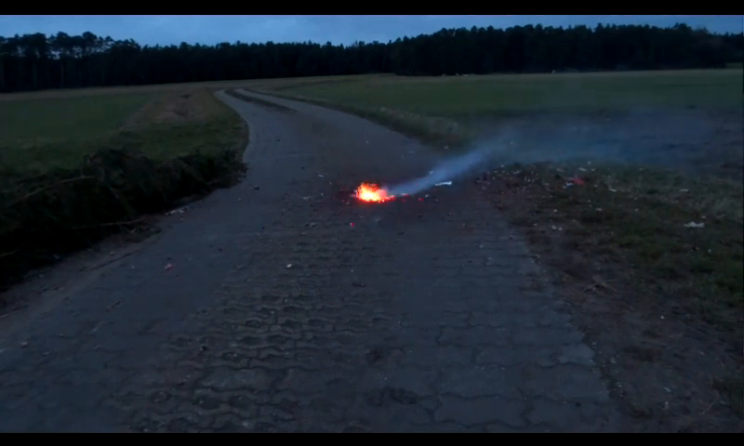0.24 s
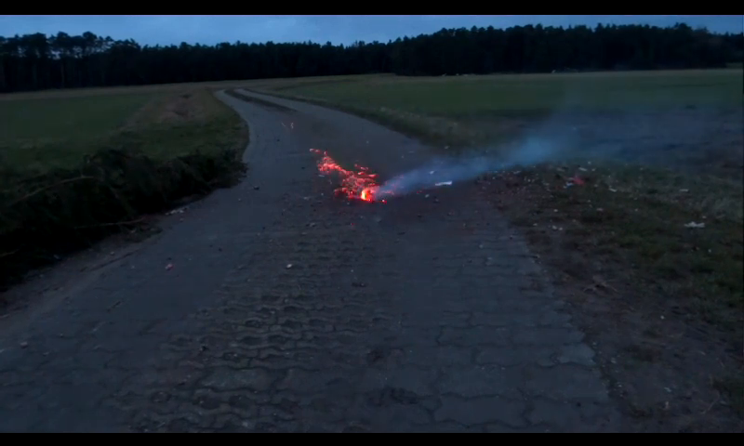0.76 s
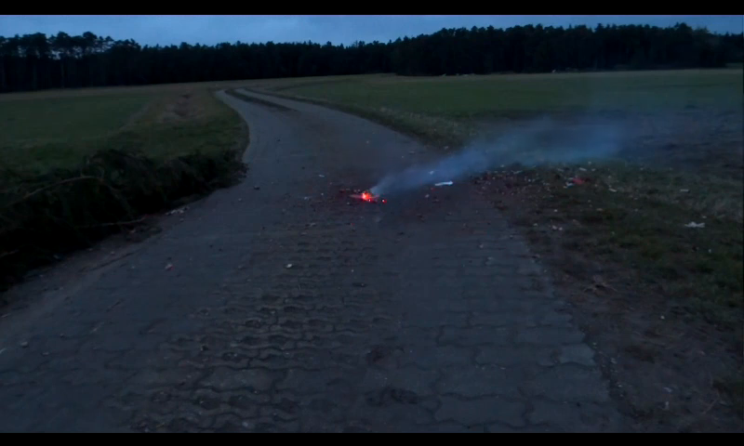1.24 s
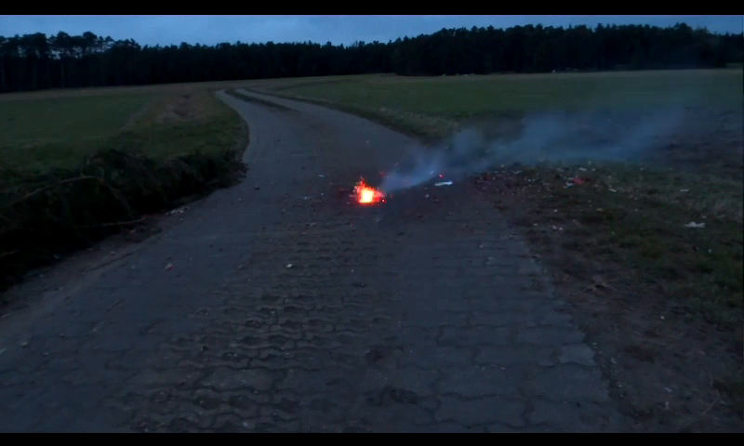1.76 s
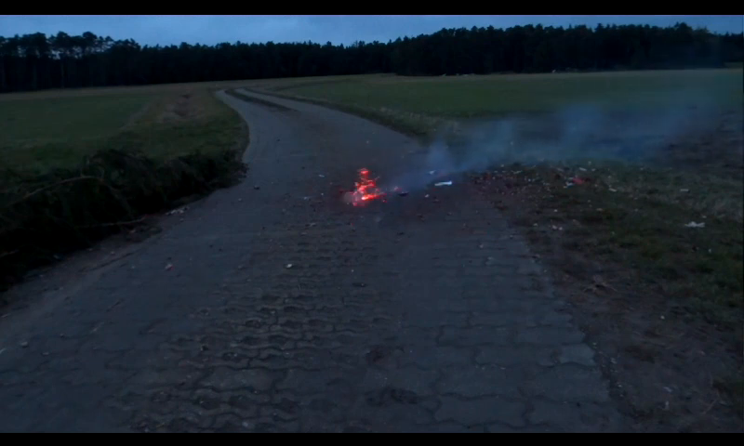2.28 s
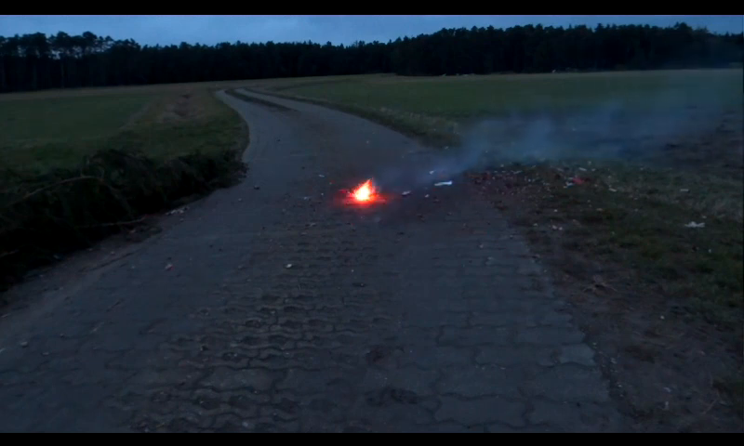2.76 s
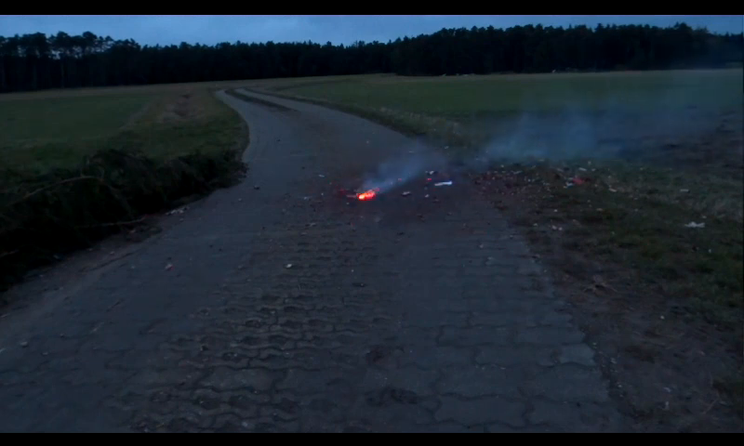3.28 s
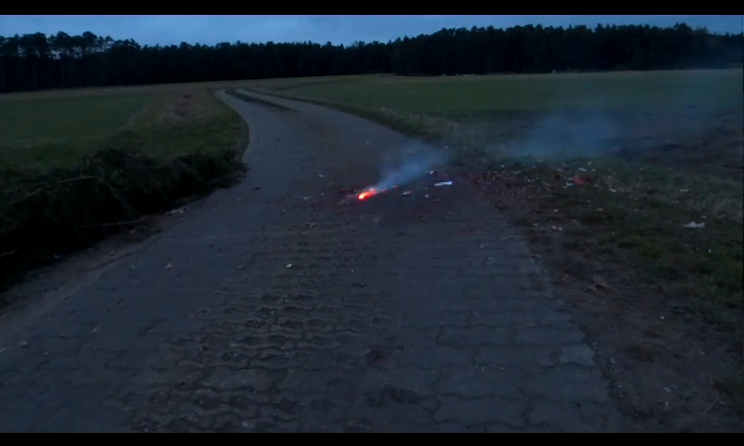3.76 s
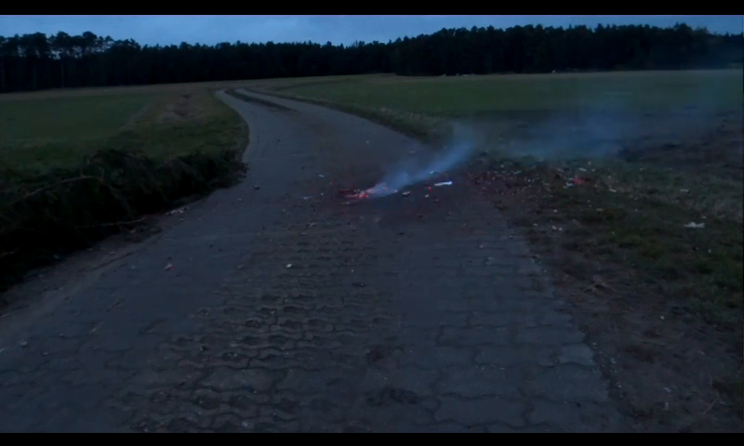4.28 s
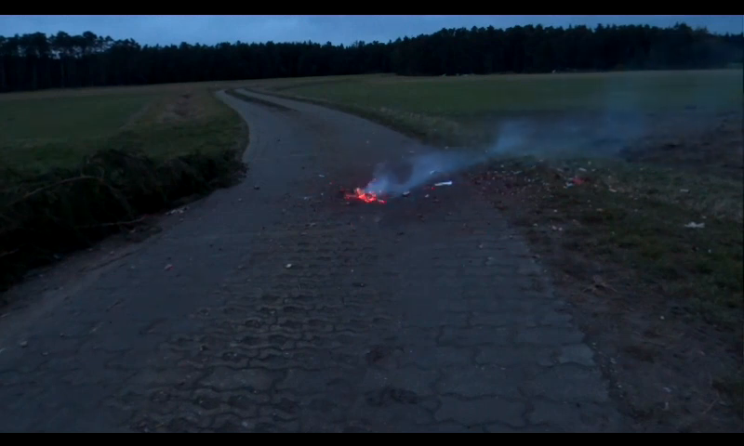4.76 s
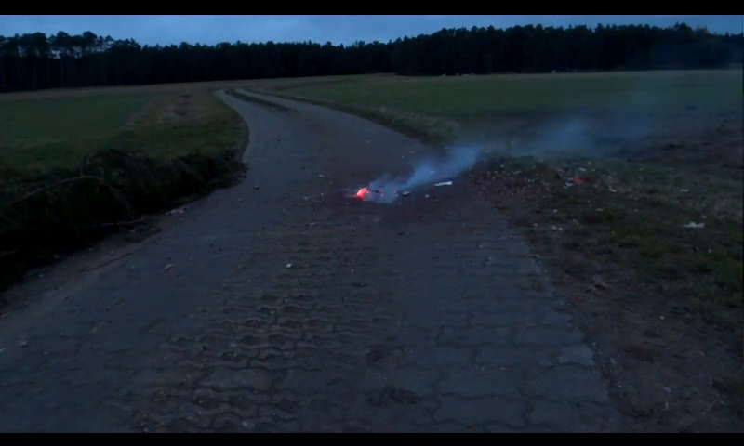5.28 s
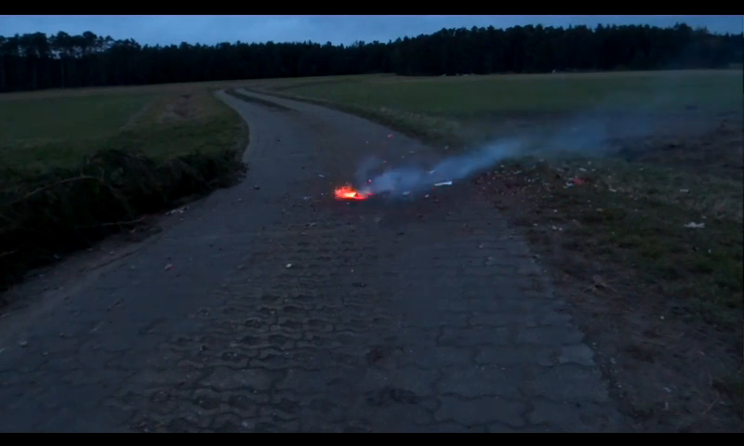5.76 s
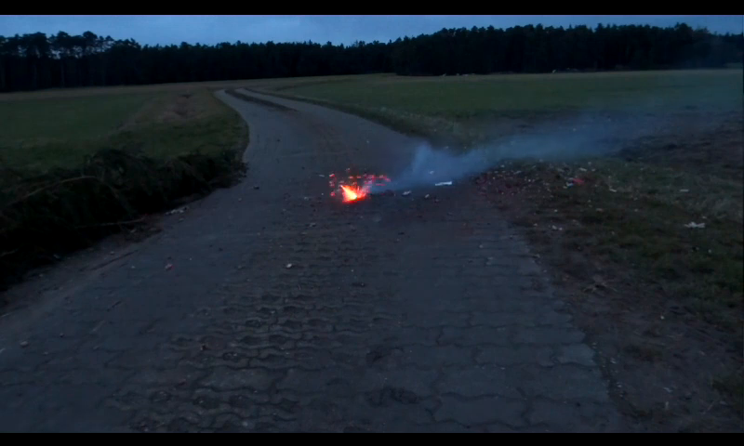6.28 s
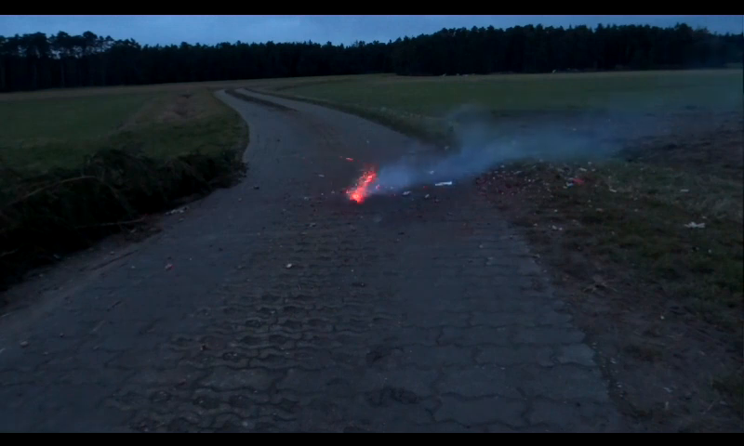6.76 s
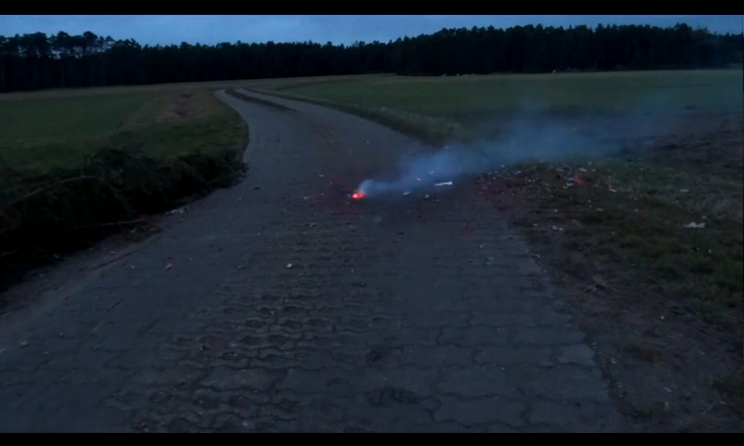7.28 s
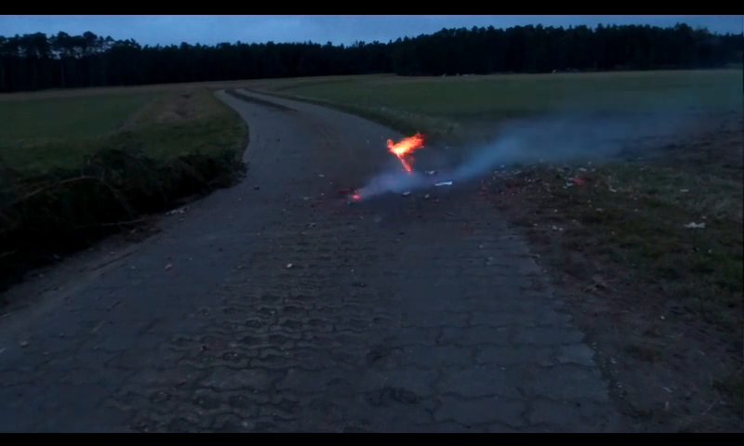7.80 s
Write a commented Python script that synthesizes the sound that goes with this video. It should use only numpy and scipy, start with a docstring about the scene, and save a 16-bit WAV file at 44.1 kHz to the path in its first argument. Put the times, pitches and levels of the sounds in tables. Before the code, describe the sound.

Sharp firecracker bangs start almost at once and continue raggedly to the end, varying from bright snaps to duller pops, singly and in tight clusters. A quiet, flickering, high hiss of burning fuse fills the gaps, with soft low wind buffets on the microphone. Open air, short dry echoes from paving and verges, a slight metallic ring at the camera body and faint woodland reverberation; the source is central and a few metres off.

```python
"""Fuse fizz and buffeting wind, then a ragged string of sharp bangs: firecrackers on a paved field lane at
dusk, some metres from the camera's two microphone ports. Each cracker is a pressure pulse plus a crack of
filtered noise; some spit gas close to the burst, as swelling noise. Every bang sets off the same pattern of
near and far echoes, rings the camera body, and scatters as shaped noise off paving, verges and woods.
The fuse is flickering coloured noise; the wind is gusting low noise with eddies at each port."""
import sys
import numpy as np
from scipy import signal
from scipy.fft import rfft, irfft
from scipy.io import wavfile
from scipy.ndimage import uniform_filter1d

SR = 44100
rng = np.random.default_rng(int(sys.argv[2]) if len(sys.argv) > 2 else 0)


def wav_record(signal):
    """Record a signal, one row per channel, as 16-bit PCM in the file named by sys.argv[1]."""
    frames = np.transpose(np.atleast_2d(signal))
    bounded = np.clip(frames, -1, 1)
    # unit amplitude maps onto the largest positive 16-bit level
    quanta = np.round(bounded * 32767).astype(np.int16)
    wavfile.write(sys.argv[1], SR, quanta)


N = 354123

# All table levels are relative: each layer adds its own trim.
# How fiercely the fuse burns: (t/s, level/dB)
FUSE_BURN = [(0.15, -41.5), (1.1, -39.5), (1.65, -36), (2.08, -42.5), (2.4, -40.5), (3.45, -39.5),
             (3.8, -38.5), (4.3, -39.5), (5.25, -40.5), (6.1, -36.5), (7.0, -43.5), (8.0, -44)]
# Gusts at the microphone: (start t/s, hold length/s, level/dB)
WIND_GUSTS = [(0.035, 0.25, -30), (0.304, 0.17, -31), (0.546, 0.068, -27.5), (0.857, 0.18, -36),
              (1.36, 0.32, -43.5), (2.094, 0.19, -43), (2.58, 0.21, -47), (2.918, 0.41, -34),
              (3.348, 0.28, -41.5), (3.744, 0.1, -29.5), (4.045, 0.35, -34), (4.542, 0.44, -35.5),
              (5.38, 0.62, -43), (5.989, 0.26, -31.5), (6.426, 0.7, -35.5), (7.184, 0.42, -36),
              (7.47, 0.28, -32), (7.717, 0.26, -29)]
# Gas spat from a casing close to its burst: (end t/s, length/s, level/dB)
GAS_SPITS = [(0.112, 0.016, -17.5), (0.37, 0.0092, -19), (0.72, 0.006, -22), (0.853, 0.0074, -26),
             (1.373, 0.031, -16.5), (1.555, 0.0073, -32), (1.775, 0.0024, -13), (2.194, 0.014, -19.5),
             (2.561, 0.0054, -21), (2.745, 0.023, -26), (2.874, 0.013, -21.5), (3.873, 0.018, -27.5),
             (4.358, .015, -20.5), (4.416, 0.0083, -20), (4.672, 0.022, -27), (5.089, 0.0045, -12),
             (6.222, 0.0086, -25), (6.302, 0.0075, -16), (6.676, 0.011, -22), (6.859, 0.0075, -19),
             (7.08, 0.01, -21.5), (7.345, 0.0056, -20), (7.804, 0.0064, -27)]
# Bursts: (t/s, pressure pulse level/dB, crack level/dB, scattered tail level/dB, length of the push/s)
BURSTS = [(0.1145, 0, -1, -15, 0.00021), (0.2606, -3, 4.5, 0.5, 0.00026), (0.372, -7.5, 6.5, 1, 0.00036),
          (.541, -10, 5.5, 0, 0.00029), (0.7230, 3.5, 12, 3, 0.00014), (0.8567, 2, -2, 4.5, 0.00023),
          (1.2757, -4, 10.5, -2.5, 0.000086), (1.3716, -6, -20, -12.5, 0.00041),
          (1.5682, 1.5, 2.5, 4.5, 0.00024), (1.588, -4, 11, -6, 0.00018), (1.7790, 4, 10.5, 1, 2e-4),
          (1.9012, 6, 5, 2.5, 0.00022), (2.1983, -2.5, -1, -1.5, 0.00032), (2.228, 1, 8.5, 0, 2e-4),
          (2.5636, 5.5, 0, -1, 0.00018), (2.7352, -4, -5, -18, 0.00019), (2.875, -2, 0.5, -13, 0.00017),
          (3.1351, -2, 5, -6.5, 0.00012), (3.3533, -6, -3, -16, 0.00024), (3.572, -2.5, 11, 0.5, 0.0002),
          (3.8753, 0.5, 9.5, -4.5, 0.00012), (4.363, -2, 11, -0.5, 0.00023), (4.418, 1, 6, -6.5, 0.00024),
          (4.426, -21, -4, -15, 1.5e-4), (4.5846, 0.5, 4, 1.5, 0.00029), (4.6735, -3.5, 5, -3, 0.000073),
          (4.994, -12, 9, 0, 0.00016), (5.008, -6.5, 4.5, 0.5, 0.00018), (5.094, 6, -7, -4.5, 0.00021),
          (5.3688, 0, 2.5, 3, 0.00022), (5.5044, -9, 5, 5, 0.00023), (5.5142, 2, 8, -7, 0.00022),
          (5.522, -0.5, 2, 4, 0.00017), (5.7894, 5, 0, -1, 0.00021), (6.2215, -14, 3.5, 1, 0.00021),
          (6.304, -10, 8, -5, 0.00013), (6.4114, 0.5, 1.5, 2, 0.00019), (6.4428, -0.5, 2, 0.5, 2e-4),
          (6.6757, 6.5, 7, 4, 0.00015), (6.746, 4, -1, 0.5, 0.00015), (6.8628, -1.5, -3.5, 0.5, 0.00018),
          (7.081, -1.5, 1, 0, 0.00018), (7.3464, 0.5, 4.5, -2.5, 0.00015),
          (7.3964, -23, 1.5, -10.5, 0.00014), (7.5496, -2, -1.5, 3, 0.00023),
          (7.6022, 2.5, -0.5, -6.5, 0.00017), (7.8034, -7, 1, 2, 0.00025)]
# Ringing of the camera body under the blast: (f/Hz, level/dB, time to fall 60 dB/s)
BODY_MODES = [(419, 6, 0.24), (558, 18.5, 0.17), (780, 2.5, 0.25), (937, -10, 0.9), (1016, 25.5, 0.22),
              (1440, 13, 0.035), (1730, 3, .12), (2237, 28, 0.1), (2930, -12, 0.79)]
# Surfaces near the lane and banks further off: (delay t/s, level/dB, centre f/Hz, width/Hz)
REFLECTIONS = [ (.0022, -9.5, 2600, 6300), (.0033, -4, 7460, 10100), (.0076, -4, 2130, 3800),
               (.0079, -5.5, 6600, 5940), (.0117, -4.5, 780, 1180), (.0155, -5.5, 540, 780),
               (.0196, -6, 810, 1000), (.0265, -26, 2110, 1920), (.0292, -9.5, 1580, 1820),
               (.0313, -5, 770, 750), (.0830, -4, 690, 485), (.1323, -5, 830, 530), (.1373, -12, 676, 500),
               (.1740, -19, 860, 565)]
# Spectrum of the fuse hiss: (f/Hz, level/dB)
FUSE_SPECTRUM = [(300, -18), (1000, -17), (2500, -9.5), (4400, -9), (5600, -7), (7300, 0), (8800, -4),
                 (11000, -10.5), (13000, -21), (16000, -28)]
# Spectrum of the wind rumble: (f/Hz, level/dB)
WIND_SPECTRUM = [(20, 1.5), (45, -1), (100, 1.5), (170, -1), (260, -7), (400, -12), (700, -20.5),
                 (1400, -37), (4000, -49.5)]
# Spectrum of the spitting gas: (f/Hz, level/dB)
JET_SPECTRUM = [(300, -16), (1000, -1.5), (3000, -3), (4500, -1.5), (7200, 6), (10000, 3), (16000, -15.5)]
# Spectrum of the crack: (f/Hz, level/dB)
CRACK_SPECTRUM = [(150, -22), (700, -7), (1300, 1), (1900, 9), (3200, 8), (4500, -0.5), (7300, 8.5),
                  (10000, 2.5), (13000, -2), (16000, -19.5)]
# Spectrum of the thud from the verges: (f/Hz, level/dB)
THUD_SPECTRUM = [(60, -23.5), (200, -13), (420, 0), (900, -2.5), (1500, -5.5), (3000, -15), (8000, -47)]
# Spectrum of the scatter off stones and grass: (f/Hz, level/dB)
SCATTER_SPECTRUM = [(200, -27), (700, -3.5), (1300, -1), (2200, 4.5), (3200, 7), (4500, 0.5), (6000, 4.5),
                    (7500, 6), (9500, -0.5), (12000, -9), (16000, -19)]
# Spectrum of the roll from the woods: (f/Hz, level/dB)
FOREST_SPECTRUM = [(100, 6), (400, -9), (900, -1), (2500, 2.5), (5000, -12), (12000, -58)]

GUST_ATTACK_S, GUST_RELEASE_S = 0.019, 0.057
BREEZE_DB, STRONG_GUST_DB = -50, -27  # before trim: wind between gusts, and a gust full of eddies
TOP_HZ = 15800  # upper edge of the recorder's passband
TIME = np.arange(N) / SR
SIDES = np.array([[1], [-1]])  # opposite signs at the two ports


def gain(db):
    """Decibels to amplitude gain."""
    return 10 ** (np.asarray(db) / 20)


def unit(x):
    """Scale to rms 1."""
    return x / np.sqrt(np.mean(x ** 2))


def unit_energy(x):
    """Scale an impulse response to energy 1, averaged over its channels."""
    return unit(x) / np.sqrt(x.shape[-1])


def curve(rows):
    """Join (t/s, value) rows by straight lines."""
    return np.interp(TIME, *np.transpose(rows))


def convolve(x, response):
    """Pass x through an impulse response, keeping its length."""
    full = signal.fftconvolve(np.atleast_2d(x), np.atleast_2d(response), axes=-1)
    return full[:, :x.shape[-1]]


def colour(x, points, size=2048):
    """Causal minimum-phase filter with a (f/Hz, level/dB) spectrum, built from its cepstrum."""
    hz, db = np.transpose(points)
    bins = np.maximum(np.arange(size // 2 + 1) * SR / size, 1)
    magnitude = gain(np.interp(np.log(bins), np.log(hz), db))
    cepstrum = irfft(np.log(magnitude))
    # fold the cepstrum onto positive time, so the response starts at once
    cepstrum[1:size // 2] *= 2
    cepstrum[size // 2 + 1:] = 0
    return convolve(x, irfft(np.exp(rfft(cepstrum))))


def band(x, hz, width):
    """Two-pole band-pass, gain 1 at the centre."""
    b, a = signal.iirpeak(hz, hz / width, fs=SR)
    return signal.lfilter(b, a, x)


def stereo_noise(count, side_db):
    """White noise common to both channels, with a share that differs."""
    mid, side = rng.standard_normal((2, count))
    return unit(mid + gain(side_db) * side * SIDES)


def walk(rate):
    """Random levels held 1 / rate s, smoothed twice, trimmed to length and scaled to rms 1."""
    hold = max(int(SR / rate), 1)
    steps = np.repeat(rng.standard_normal(N // hold + 1), hold)
    smooth = uniform_filter1d(uniform_filter1d(steps, hold), hold)
    return unit(smooth[:N])


def add(track, s, sound):
    """Mix a sound into a track at time s."""
    i = max(int(s * SR), 0)
    track[..., i:i + sound.shape[-1]] += sound[..., :N - i]


def fuse(trim_db=-1, flicker_db=2.96, spark_db=1.0):
    """The fuse fizzes straight ahead with tiny sparks; its hiss slowly shifts in colour."""
    sparks = rng.standard_normal(N) * gain(spark_db * walk(1200))
    hiss = colour(sparks, FUSE_SPECTRUM)
    # two treble bands drift up and down on their own
    shifts = sum((gain(1.8 * walk(4)) - 1) * band(hiss, hz, 1800) for hz in (6200, 8600))
    level_db = trim_db + curve(FUSE_BURN) + flicker_db * walk(23)
    return unit(hiss + shifts) * gain(level_db)


def swell(start, length, attack, release):
    """One gust: it builds up, holds for its length and dies away."""
    age = np.maximum(TIME - start, 0)
    rise = 1 - np.exp(-age / attack)
    return rise * np.exp(-np.maximum(age - length, 0) / release)


def airflow(wander_db=3.5, lump_db=1.4):
    """Wind strength in dB: the powers of lumpy gusts and a light, wandering breeze add up."""
    gusts = sum((gain(db) * swell(start, length, GUST_ATTACK_S, GUST_RELEASE_S)) ** 2
                for start, length, db in WIND_GUSTS)
    breeze = gain(BREEZE_DB + wander_db * walk(1.9)) ** 2
    lumps = gain(lump_db * walk(22)) ** 2
    return 10 * np.log10(breeze + gusts * lumps)


def wind(trim_db=-4, flutter_db=2.0, eddy_db=-0.5, eddy_growth=1.57, eddy_hz=215, eddy_width=240):
    """A deep rumble largely shared by both ports; small eddies differ at each and outgrow it in gusts."""
    gust_db = airflow()
    rumble = unit(colour(stereo_noise(N, side_db=-9.5), WIND_SPECTRUM)) * gain(trim_db + gust_db)
    eddy_noise = stereo_noise(N, side_db=0.0)
    eddies = unit(band(band(eddy_noise, eddy_hz, eddy_width), eddy_hz, eddy_width))
    # eddies gain eddy_growth dB for each dB of wind
    eddy_level = gain(eddy_db + STRONG_GUST_DB + eddy_growth * (gust_db - STRONG_GUST_DB))
    return (rumble + eddies * eddy_level) * gain(flutter_db * walk(70))


def spits(trim_db=-6, grit_db=3.0):
    """Jets of burning gas: gritty noise that swells and breaks off."""
    jets = np.zeros(N)
    for end, length, jet_db in GAS_SPITS:
        ramp = np.linspace(0, 1, max(int(length * SR), 2))
        add(jets, end - length, gain(jet_db) * ramp)
    gas = rng.standard_normal(N) * gain(grit_db * walk(4000))
    return gain(trim_db) * jets * unit(colour(gas, JET_SPECTRUM)[0])


def blasts(pulse_db=-2, crack_s=0.00091, crack_db=1.0, tear_db=-4):
    """Each burst: a pressure pulse with a shock front, and a casing that tears differently each time."""
    t = TIME[:1024]
    direct = np.zeros(N)
    for s, push_db, snap_db, _, push_s in BURSTS:
        # overpressure, then suction; a longer push makes a duller pop
        age = t / push_s
        pulse = (1 - age) * np.exp(-age)
        tear = gain(tear_db) * unit_energy(rng.standard_normal(len(t)) * np.exp(-t / crack_s))
        click = t == 0
        crack = unit_energy(colour(tear + click, CRACK_SPECTRUM)[0])
        add(direct, s, gain(pulse_db + push_db) * pulse + gain(crack_db + snap_db) * crack)
    return direct


def ports(x, side_db=-8, hz=7300, width=2600):
    """Treble bends round the camera body and reaches the two microphone ports out of step."""
    bent = np.gradient(band(x, hz, width))
    return x + gain(side_db) * bent * SIDES


def body(trim_db=-20):
    """Impulse response of the camera body: decaying sine modes struck by every blast."""
    t = TIME[:SR // 4]
    rings = sum(gain(mode_db - 60 * t / t60) * np.sin(2 * np.pi * hz * t)
                for hz, mode_db, t60 in BODY_MODES)
    return gain(trim_db) * unit_energy(rings)


def echoes(side_db=-10):
    """Each reflection returns one band of the bang, rounded off, leaning to alternate sides."""
    response = np.zeros((2, SR // 4))
    click = 1. * (TIME[:512] == 0)
    for k, (delay, db, hz, width) in enumerate(REFLECTIONS):
        slap = band(band(click, hz, width), hz, width)
        lean = 1 + (-1) ** k * gain(side_db) * SIDES
        add(response, delay, gain(db) * slap * lean)
    return response


def wash(levels_db, fall, spectrum, side_db, grain_db, clump_db):
    """Countless small reflections: grainy, clumped noise whose power follows each bang with the same fall."""
    power = np.zeros(N)
    for burst, db in zip(BURSTS, levels_db):
        add(power, burst[0], (gain(db) * fall) ** 2)
    grains = stereo_noise(N, side_db) * gain(grain_db * walk(2500) + clump_db * walk(300))
    return np.sqrt(power) * unit(colour(grains, spectrum))


def verge(trim_db=-26, rise_s=0.0016, decay_s=0.049, tail_share=0.26):
    """The pulse rolls back from the verges as a dull thud, more so from bursts that scatter widely."""
    t = TIME[:SR // 2]
    fall = (1 - np.exp(-t / rise_s)) * np.exp(-t / decay_s)
    _, push_db, _, tail_db, _ = np.transpose(BURSTS)
    levels_db = push_db + tail_share * tail_db
    return gain(trim_db) * wash(levels_db, fall, THUD_SPECTRUM, side_db=-16, grain_db=2, clump_db=3)


def paving(trim_db=-15, early_s=0.0035, late_s=0.042, late_db=-6, rise_s=0.0033):
    """The crack scatters off stones and grass: a quick fall, then a slower one."""
    t = TIME[:SR // 2]
    decay = np.exp(-t / early_s) + gain(late_db) * np.exp(-t / late_s)
    fall = (1 - np.exp(-t / rise_s)) * decay
    tail_db = np.array(BURSTS)[:, 3]
    scatter = wash(tail_db, fall, SCATTER_SPECTRUM, side_db=-18.5, grain_db=1.4, clump_db=1.43)
    return gain(trim_db) * scatter


def forest(trim_db=-45, rise_s=0.011, decay_s=0.25):
    """A faint, slowly decaying roll from the edge of the woods."""
    t = TIME[:2 * SR]
    fall = (1 - np.exp(-t / rise_s)) * np.exp(-t / decay_s)
    tail_db = np.array(BURSTS)[:, 3]
    roll = wash(tail_db, fall, FOREST_SPECTRUM, side_db=-16, grain_db=1.5, clump_db=3)
    return gain(trim_db) * roll


def scene(direct_db=5):
    """Bangs with their echoes over fuse and wind."""
    burst = spits() + blasts()
    direct = gain(direct_db) * ports(burst)
    returned = convolve(burst, echoes() + body())
    return fuse() + wind() + direct + returned + verge() + paving() + forest()


def record(dry):
    """The microphone overloads softly on the shock fronts; the recorder rolls off the top."""
    ceiling = .62  # full-scale amplitude that the overload approaches
    clipped = ceiling * np.tanh(dry / ceiling)
    toned = colour(clipped, [(20, -1), (60, 2.5), (8500, -2.5), (12000, -5), (16000, -12.0)])
    top_cut = signal.ellip(8, .2, 70, TOP_HZ, fs=SR, output="sos")
    return signal.sosfilt(top_cut, toned)


dry = scene()
out = record(dry)
wav_record(out)
```